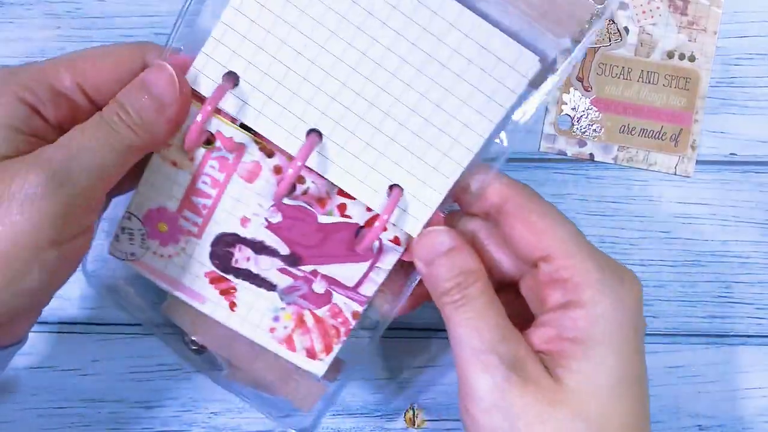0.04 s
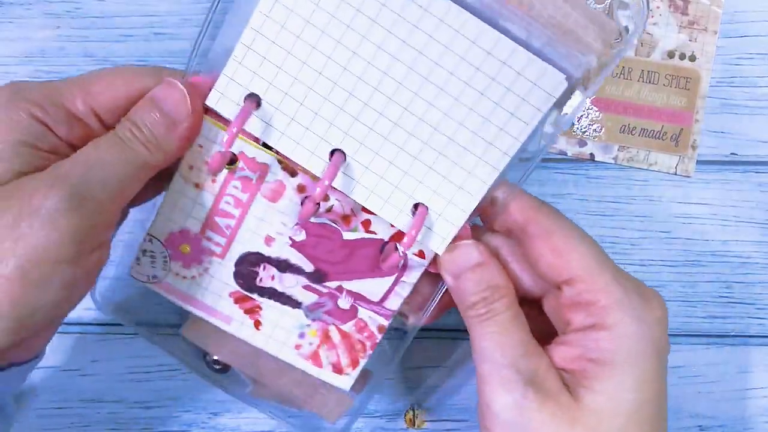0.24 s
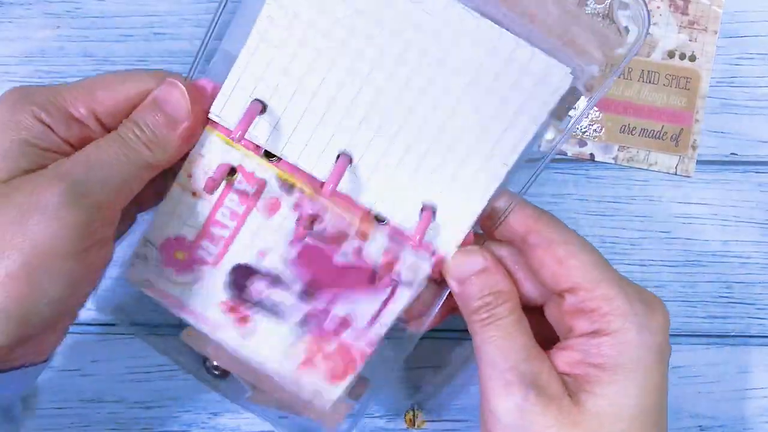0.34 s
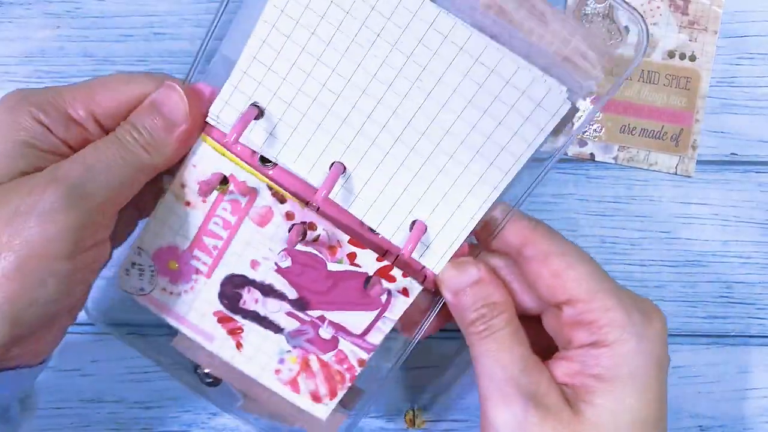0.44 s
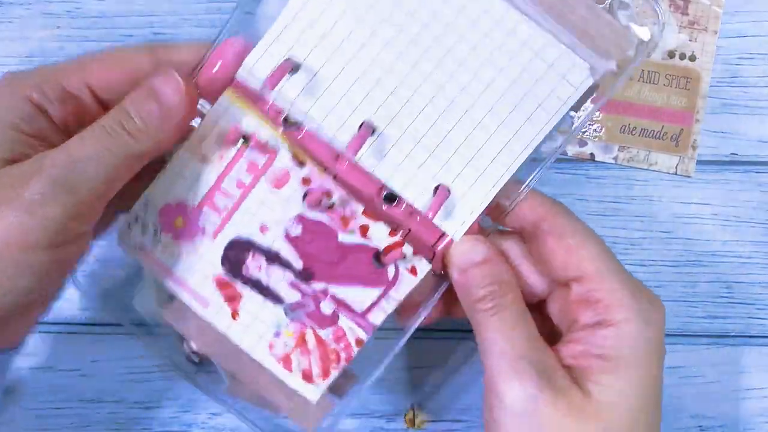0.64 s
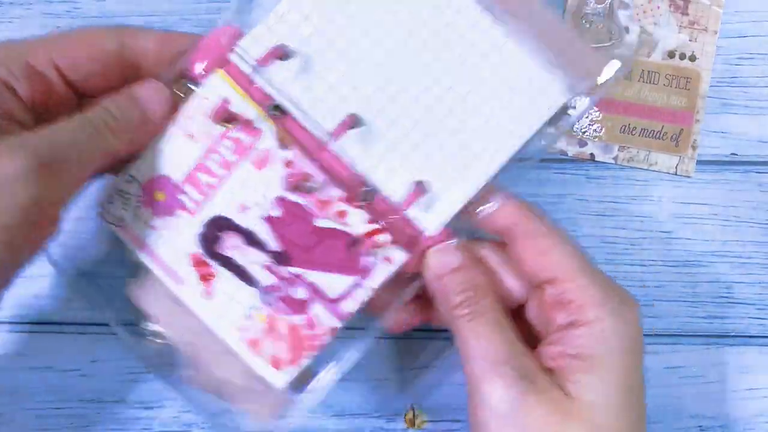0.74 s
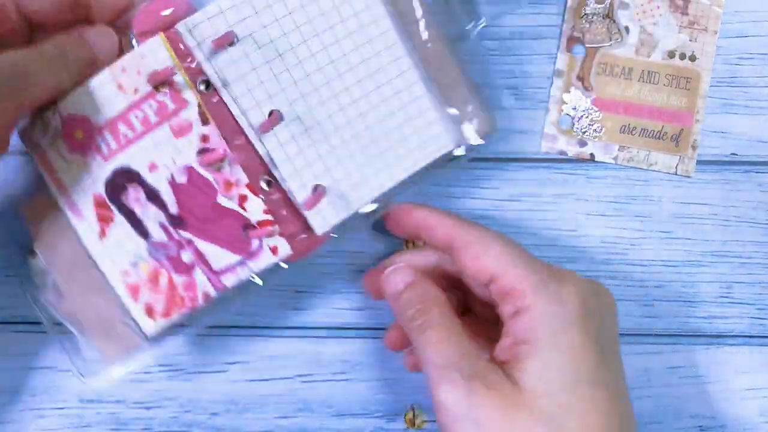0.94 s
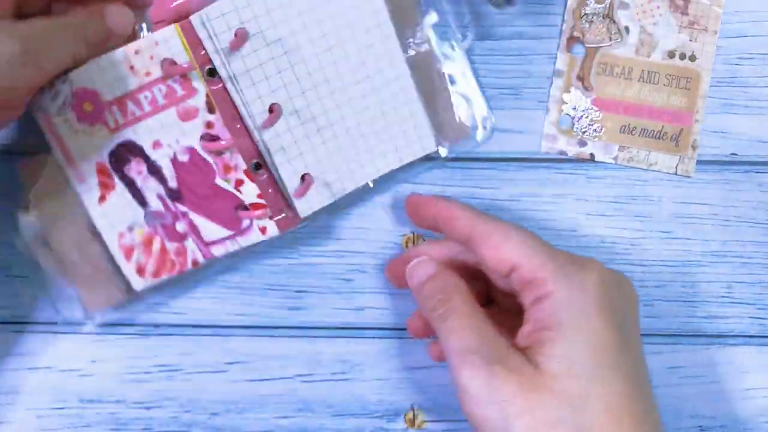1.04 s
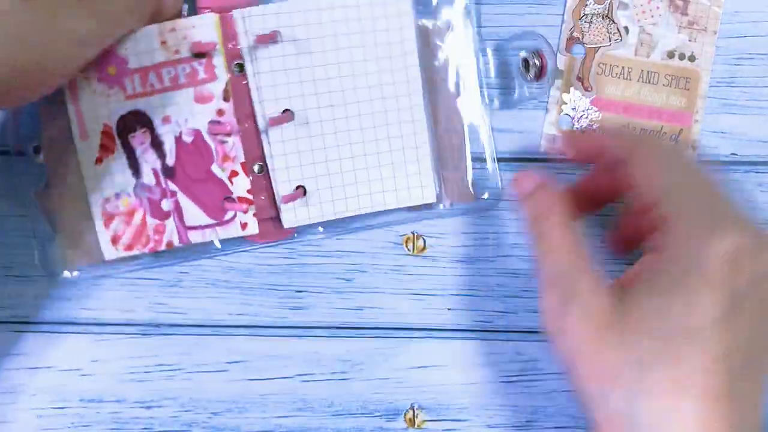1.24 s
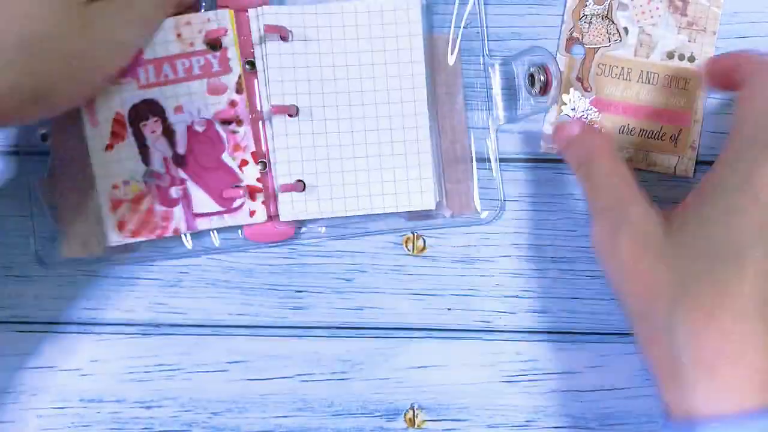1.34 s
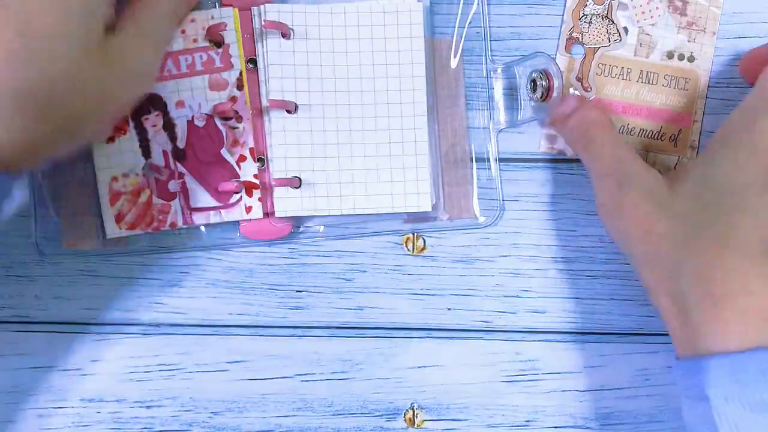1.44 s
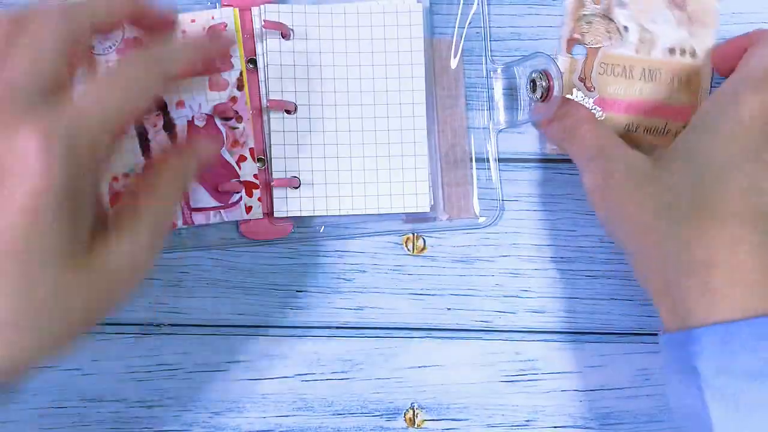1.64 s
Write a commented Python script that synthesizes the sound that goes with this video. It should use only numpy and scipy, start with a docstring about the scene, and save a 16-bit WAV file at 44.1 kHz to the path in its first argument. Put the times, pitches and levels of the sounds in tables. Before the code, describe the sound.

Three plastic rings of a small binder snap shut close to the microphone, the last hardest. The vinyl cover then ticks, pages rustle faintly and the binder knocks softly onto a table in a small, humming room.

```python
"""A small room hums with low ventilation rumble and a soft hiss. Pages stir faintly, then three plastic
rings of a small binder are pressed shut one after another, close to the microphone. The last snap is
the hardest, and the room echoes each one. The binder is then turned: its vinyl cover ticks, the metal
press stud tinks and pages rustle. Finally it is laid on a table with soft knocks, and the table rings."""
import sys
import numpy as np
from scipy import signal
from scipy.fft import rfft, irfft, next_fast_len
from scipy.io import wavfile
from scipy.ndimage import uniform_filter1d

SR = 44100
rng = np.random.default_rng(int(sys.argv[2]) if len(sys.argv) > 2 else 0)


def transcribe(signal):
    """Save signal, clipped to [-1, 1], as a 16-bit WAV file at the path in sys.argv[1]."""
    frames = np.atleast_2d(signal).T
    limited = np.clip(frames, -1, 1)
    pcm = np.round(limited * 32767).astype(np.int16)
    wavfile.write(sys.argv[1], SR, pcm)


N = 74970


def amp(db):
    """Turn decibels into a factor to multiply by."""
    return 10 ** (np.asarray(db) / 20)


def unit(x):
    """Scale x to an average strength (rms) of 1."""
    return x / np.sqrt(np.mean(x ** 2) + 1e-20)


def along(points, hz):
    """Read between (frequency [Hz], value) points, spacing the octaves evenly."""
    freqs, values = np.transpose(points)
    return np.interp(np.log(hz + 1), np.log(freqs + 1), values)


def curve(points):
    """Join (time [s], value) points with straight lines, one value per sample."""
    return np.interp(np.arange(N) / SR, *np.transpose(points))


def filtered(x, gain):
    """Turn each frequency in x up or down by gain(hz)."""
    size = next_fast_len(len(x) + 8192)
    return irfft(rfft(x, size) * gain(np.fft.rfftfreq(size, 1 / SR)), size)[:len(x)]


def noise(colour_db):
    """Noise of strength 1, with its mix of low and high set by colour_db(hz)."""
    return unit(filtered(rng.standard_normal(N), lambda hz: amp(colour_db(hz))))


def band(centre_hz, octaves):
    """Noise that is strongest around one pitch."""
    def colour_db(hz):
        hump = -40 * np.log10(1 + (np.log2((hz + 1) / centre_hz) / octaves) ** 2 / 2)
        bass_cut = -10 * np.log10(1 + (centre_hz / (hz + 1) / 10) ** 4)
        return hump + bass_cut
    return noise(colour_db)


def decay(t60, hold=0):
    """Stay full for hold seconds, then fall 60 dB every t60 seconds (the fade time)."""
    return amp(-60 * np.maximum(np.arange(N) / SR - hold, 0) / t60)


def ringing(tones):
    """The fading tones of a struck object, each at a slightly random level."""
    t = np.arange(N) / SR
    return sum(amp(db + rng.standard_normal()) * np.sin(2 * np.pi * hz * t) * decay(t60)
               for hz, db, t60 in tones)


def add(out, start_s, x):
    """Mix x into out from start_s on."""
    i = max(round(start_s * SR), 0)
    out[i:] += x[:N - i]


def taps(rows):
    """Each contact is a burst of noise that dies quickly."""
    out = np.zeros(N)
    for start_s, db, hz, octaves, t60 in rows:
        add(out, start_s, amp(db) * band(hz, octaves) * decay(t60))
    return out


def background():
    """Ventilation rumbles unevenly; a soft hiss is quieter after the hardest snap."""
    # tone colour of each noise (frequency [Hz], relative level [dB])
    rumble_colour = [(20, -16), (32, -14.5), (42, -8.5), (50, -10), (60, 1.5), (76, -8), (95, -13),
                     (110, 2), (140, -15), (172, -9), (198, -15), (225, -11), (290, -23), (420, -33.5),
                     (900, -58)]
    hiss_colour = [(210, 3), (350, 0), (467, -3.5), (522, -2), (830, -1), (1060, 0.5), (1300, -3),
                   (1910, -9.5), (2070, -8.5), (14100, -34), (16000, -42)]
    # loudness of each noise (time [s], level [dB])
    rumble_level = [(0, -35), (.2, -34), (.28, -37), (.33, -31.5), (.42, -36), (.55, -35.5), (.64, -48),
                    (.72, -38), (.95, -38), (1.04, -43.5), (1.19, -37), (1.28, -40), (1.36, -38),
                    (1.5, -38), (1.64, -32.5), (1.7, -42.5)]
    hiss_level = [(0, -43.5), (.1, -45), (.22, -43), (.33, -48), (.44, -46.5), (.62, -52), (.9, -50.5),
                  (1.25, -49), (1.5, -49.5), (1.7, -49)]
    rumble = amp(curve(rumble_level)) * noise(lambda hz: along(rumble_colour, hz))
    hiss = amp(curve(hiss_level)) * noise(lambda hz: along(hiss_colour, hz))
    return rumble + hiss


def room(x, delay_s=.004):
    """The walls return x as a blurred echo, new each time; each frequency fades at its own speed."""
    # how long the echo lasts (frequency [Hz], fade time [s])
    fade_times = [(200, 0.29), (1300, 0.34), (3000, 0.27), (7000, 0.4), (15000, 0.23)]
    # tone colour of the echo (frequency [Hz], relative level [dB])
    colour = [(200, 12), (800, -1.5), (1280, 1), (1800, -3.5), (2500, 2.5), (6000, -6.5), (15000, -5.5)]
    hz, t, spectrum = signal.stft(rng.standard_normal(SR // 2), SR, nperseg=256)
    fade = amp(-60 * t / along(fade_times, hz)[:, None])
    tail = signal.istft(spectrum * fade * amp(along(colour, hz))[:, None], SR, nperseg=256)[1]
    delayed = np.pad(x, (round(delay_s * SR), 0))
    return signal.fftconvolve(delayed, tail / np.linalg.norm(tail))[:N]


def pages(grain_db=2.5):
    """Paper and vinyl slide with grainy swishes."""
    # slides (start [s], length [s], level [dB], centre [Hz], width [octaves])
    rustles = [(0.0, 0.067, -54, 3940, 1.2), (0.119, .07, -59.5, 6100, 2.8), (0.819, 0.085, -57, 6000, 1.7),
               (0.965, 0.079, -56, 5400, 1.4), (1.033, 0.023, -48, 6830, 1.6),
               (1.104, 0.098, -52.5, 4500, 3.6), (1.464, 0.043, -55.5, 5240, 1.2),
               (1.543, 0.061, -53.5, 3900, 0.75), (1.584, 0.15, -56.5, 1780, 0.46),
               (1.586, 0.16, -59.5, 3440, 0.13)]
    out, t = np.zeros(N), np.arange(N) / SR
    for start_s, length, db, hz, octaves in rustles:
        grains = amp(grain_db * unit(uniform_filter1d(rng.standard_normal(N), size=60)))
        stroke = np.sin(np.pi * np.clip(t / length, 0, 1))
        add(out, start_s, amp(db) * stroke * unit(grains * band(hz, octaves)))
    return out


def table(settle_s=1.575):
    """The binder knocks softly on the table, whose top rings on as the binder settles."""
    # knocks (time [s], level [dB], centre [Hz], width [octaves], fade time [s])
    knocks = [(1.1145, -27, 550, 1.2, 0.02), (1.1670, -38, 1110, 0.23, 0.017), (1.468, -39, 291, 0.39, 0.2),
              (1.558, -40, 302, 2.1, 0.099), (1.581, -32.5, 312, 1.25, 0.046)]
    # tones of the table top (pitch [Hz], level [dB], fade time [s])
    tones = [(313.6, -39, .2), (369, -49, 1)]
    out = taps(knocks)
    add(out, settle_s, ringing(tones))
    return out


def stud(brushed_s=0.8142):
    """The metal press stud is brushed and rings briefly."""
    # tones of the stud (pitch [Hz], level [dB], fade time [s])
    tones = [(5400, -45, .02), (6230, -28.5, 0.032), (7250, -38, 0.025), (9790, -35, 0.026),
             (13200, -43, 0.024)]
    out = np.zeros(N)
    add(out, brushed_s, ringing(tones))
    return out


def cover_ticks(dull_hz=1412, dull_octaves=1.12, dull_t60=.016):
    """Each bright tick of the vinyl also shakes the cover, which adds a duller tap. The narrow ping at 1.172 s
    is the metal press stud ringing once more."""
    # ticks (time [s], level [dB], centre [Hz], width [octaves], fade time [s], dull tap level [dB])
    ticks = [(0.076, -40, 4000, 0.73, 0.0068, -38), (0.4513, -37.5, 6500, 1.5, 0.011, -34.5),
             (0.8152, -43, 8000, 0.54, .025, -45.5), (0.8979, -36, 6160, 0.4, 0.021, -45),
             (1.018, -44, 5040, 1.4, 0.026, -48), (1.0422, -47, 6800, 0.92, 0.033, -61),
             (1.1137, -16.5, 7800, 0.77, 0.0063, -35.5), (1.1240, -37, 7000, 1.1, 0.018, -42),
             (1.1278, -34.5, 7540, 0.62, .02, -49), (1.1316, -30, 3970, 1.5, 0.01, -38),
             (1.1529, -36, 6300, 0.2, 0.032, -41), (1.1620, -26, 4600, 0.68, 0.0074, -42),
             (1.1717, -31, 7800, 1.2, 0.0095, -64), (1.1720, -31, 5580, .06, 0.027, -57),
             (1.3505, -29, 7020, 0.7, 0.0054, -45.5), (1.405, -47, 6960, 1.1, 0.012, -62),
             (1.431, -48, 7000, 1.1, .012, -49), (1.442, -44, 5200, 0.49, 0.04, -54),
             (1.528, -45, 4970, 0.62, 0.0089, -58), (1.5448, -31, 5100, 0.49, 0.02, -35),
             (1.5488, -28, 5860, 0.59, 0.0073, -37.5), (1.6217, -45, 3150, 0.33, 0.012, -55)]
    bright = [tick[:5] for tick in ticks]
    dull = [(start_s, dull_db, dull_hz, dull_octaves, dull_t60) for start_s, *_, dull_db in ticks]
    return taps(bright) + taps(dull)


def crack(tilt_db, scrape_s, t60=.013):
    """A ring's tips scrape past each other in a bright burst; tilt_db tips the treble up or down."""
    # tone colour of the crack (frequency [Hz], relative level [dB])
    colour = [(250, -10), (450, -17.5), (800, 7.5), (1500, 7.5), (2100, -2), (2800, -7), (4000, -1),
              (5500, -1), (7000, -2), (9200, 0.5), (11000, -3), (15200, 2.5), (16500, -33.5)]
    burst = noise(lambda hz: along(colour, hz) + tilt_db * np.log2(np.maximum(hz, 1000) / 1000))
    return burst * decay(t60, scrape_s)


def snaps(rise_s=0.00056, pop_t60=.006, directions=3):
    """As each ring shuts, the spine pops with falling pitch, the ring sounds and its tips crack."""
    # snaps (time [s], pop level [dB], pop pitch [Hz], pitch fall [octaves/s], pop hold [s], scrape [s],
    # crack level [dB], crack tilt [dB/octave], ring gain [dB], echo gain [dB])
    closings = [(0.2382, -12.5, 1456, 265, .0016, .0009, -15.5, -3, -16, -18),
                (0.2899, -12, 1420, 200, .0034, .0010, -23, -2, -27, -13.5),
                (0.4746, -7, 1370, 40, .0045, 0.00445, -9.5, 1, -15, -11)]
    # one list of tones for each ring, in snap order (pitch [Hz], relative level [dB], fade time [s])
    ring_tones = [
        [(600, -2, 0.013), (815, -13, 0.023), (1300, -2, 0.027), (1760, -13.5, 0.014), (5420, -5, .005),
         (6790, -5, .005)],
        [(641, 2, 0.013), (1725, 4.5, 0.059), (3020, -9, .012), (8600, -9.5, .042)],
        [(850, -4, .022), (1300, -25, 0.043), (1600, 3.5, 0.031), (1800, -22.5, 0.018), (2380, -4.5, 0.023),
         (5365, 1.5, 0.025), (8740, -6.5, 0.014), (12400, -1.5, 0.014)],
    ]
    out, t = np.zeros(N), np.arange(N) / SR
    swell = 1 - np.exp(-(t / rise_s) ** 2)
    for closing, tones in zip(closings, ring_tones):
        start_s, pop_db, pop_hz, fall, hold_s, scrape_s, crack_db, tilt_db, ring_db, echo_db = closing
        pitch = pop_hz * 2 ** (-fall * t)
        pop = np.sin(2 * np.pi * np.cumsum(pitch) / SR) * decay(pop_t60, hold_s)
        body = swell * (amp(pop_db) * pop + amp(ring_db) * ringing(tones))
        # the crack reaches the walls differently in each direction
        crack_echo = sum(room(crack(tilt_db, scrape_s)) for _ in range(directions)) / np.sqrt(directions)
        direct = body + amp(crack_db) * crack(tilt_db, scrape_s)
        echo = room(body) + amp(crack_db) * crack_echo
        add(out, start_s, direct + amp(echo_db) * echo)
    return out


def scene(echo_db=-19):
    """The snaps, the handling of the binder with its echo, and the background, in one channel."""
    handling = cover_ticks() + table() + stud() + pages()
    return (snaps() + handling + amp(echo_db) * room(handling) + background())[None]


def record(dry, ceiling=.95, top_hz=15600):
    """The recorder rounds off the highest peaks and cuts the treble above top_hz."""
    rounded = dry[0] / (1 + np.abs(dry[0] / ceiling) ** 6) ** (1 / 6)
    return filtered(rounded, lambda hz: 1 / np.sqrt(1 + (hz / top_hz) ** 120))[None]


dry = scene()
out = record(dry)
transcribe(out)
```